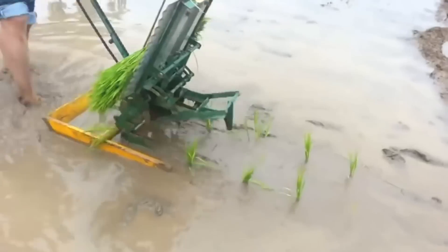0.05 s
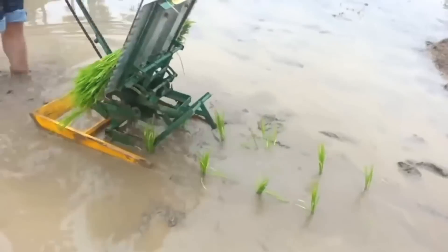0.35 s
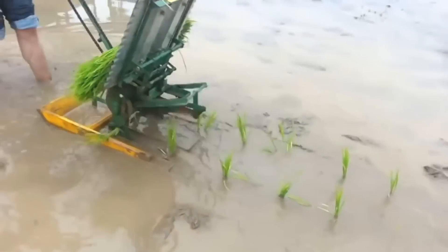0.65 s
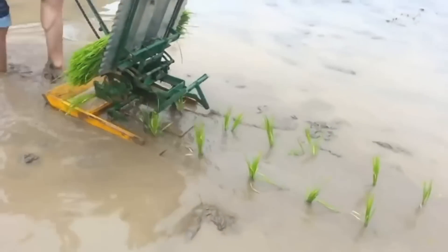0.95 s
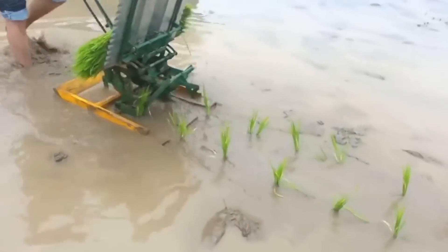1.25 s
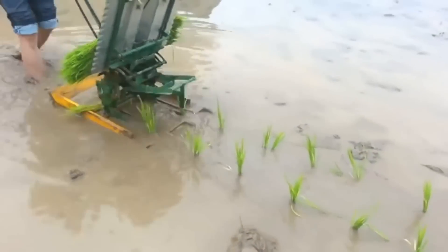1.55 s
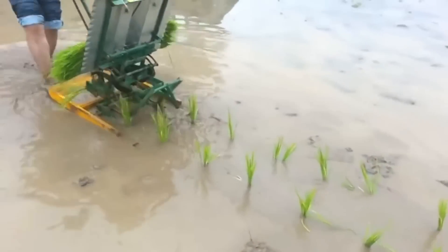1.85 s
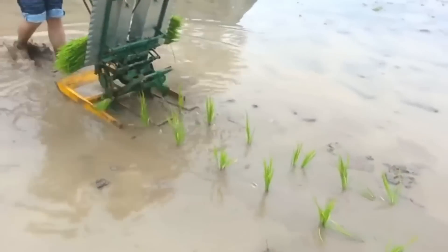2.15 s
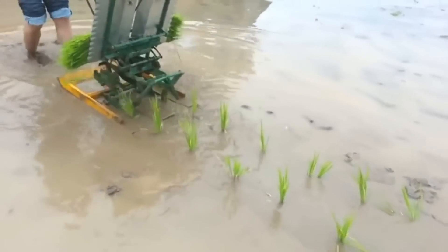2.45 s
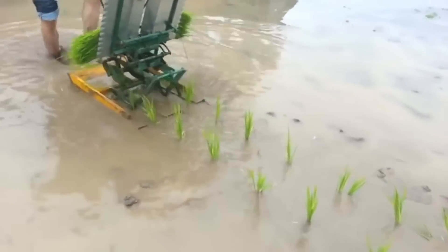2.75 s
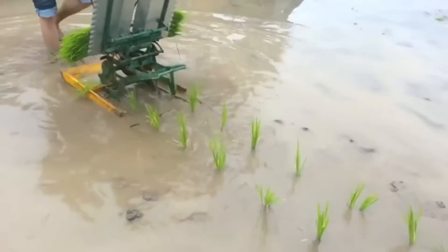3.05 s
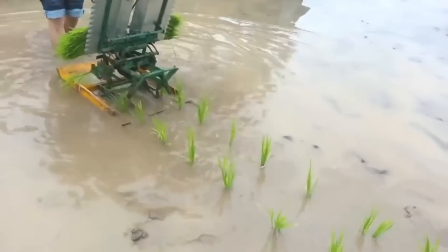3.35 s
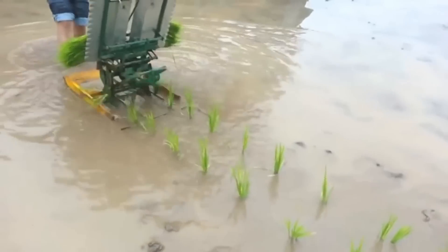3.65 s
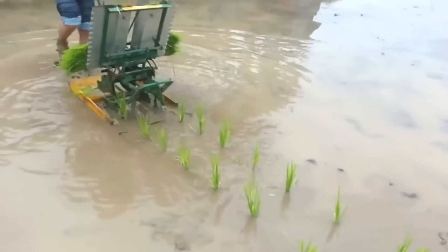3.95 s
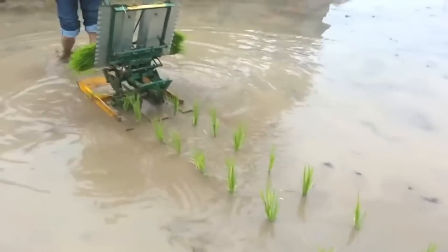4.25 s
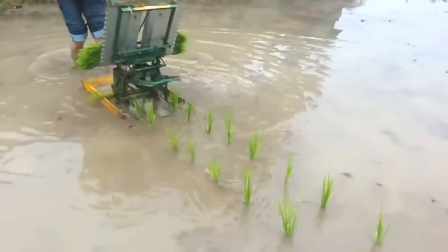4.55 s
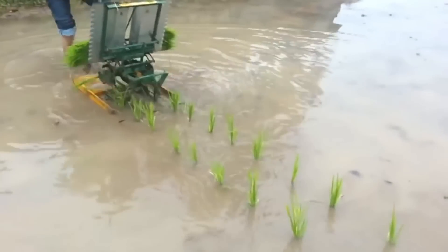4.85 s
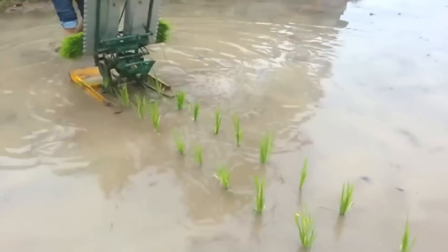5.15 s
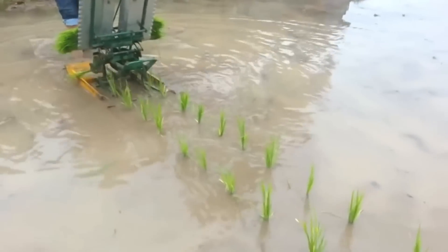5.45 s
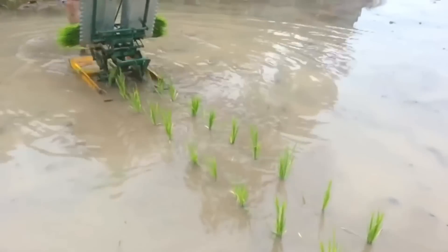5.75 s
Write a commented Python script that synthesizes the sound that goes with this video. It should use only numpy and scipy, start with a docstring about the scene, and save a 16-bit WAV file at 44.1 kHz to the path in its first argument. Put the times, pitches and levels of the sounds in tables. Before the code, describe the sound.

Close microphones in the open pick up the even metallic beat of a manual rice planter, twelve strokes in about six seconds. Slack steel parts rattle, the planting arms slam against their stop, and the mechanism ticks back, with thin pings and stray clicks between. Feet and a skid stir a continuous soft wash of shallow muddy water, which plops about halfway through and eases slightly toward the end.

```python
"""Muddy water sloshes as a hand-pulled rice transplanter works through a flooded paddy, two strokes a second.
In each stroke the slack steel linkage rattles and the planting arms slam against their stop: impacts
that excite the damped modes of steel, tray and frame. In most strokes a pawl pings, and the mechanism
ticks on its way back. Feet and skid stir up splashes and air pockets that ring as bubbles.
Heard in the open on a close pair of microphones."""
import sys
import numpy as np
from scipy import signal
from scipy.fft import rfft, irfft, next_fast_len
from scipy.io import wavfile

SR = 44100
rng = np.random.default_rng(int(sys.argv[2]) if len(sys.argv) > 2 else 0)


def pcm_store(signal):
    """Save signal as 16-bit PCM."""
    levels = np.round(np.clip(np.atleast_2d(signal), -1, 1) * 32767)
    wavfile.write(sys.argv[1], SR, levels.astype(np.int16).T)


N = 255074
CUTOFF_HZ = 14900

# Spectra of the tray, the steel and the crack of contact: (frequency [Hz], relative density [dB])
TRAY_SPECTRUM = [(120, -63), (250, -20), (420, -14), (560, -2), (760, -2), (880, -6), (1050, -4), (1400, 2),
                 (1900, 0.5), (2400, 0), (3200, -24)]
STEEL_SPECTRUM = [(1400, -41), (2200, -7), (2800, -2), (3600, 1.5), (4400, -3), (5000, -2), (5600, -14.5),
                  (7000, -33)]
CRACK_SPECTRUM = [(3500, -20), (5500, 6.5), (7500, 3), (9700, 4), (10500, 1), (12300, 0), (13200, -1.5),
                  (14600, -16)]
# The microphone pair: (frequency [Hz], coherence [0-1], phase lag of the right [rad])
MIC_PAIR = [(100, 1, -0.5), (700, 0.88, 0.3), (1610, 0.71, 0.5), (2050, 0.34, -1.53), (2660, 0.54, -3.5),
            (4000, 0.51, -2.5), (5200, 0.83, -2.5), (6540, 0.23, -2.5), (13900, 0.089, -0.5)]
# Planting strokes; levels are relative, leads precede the slam and the delay follows it:
# (slam time [s], slam level [dB], tray level [dB], thud level [dB], rattle lead [s], rattle level [dB],
#  latch lead [s], latch level [dB], rebound level [dB], return delay [s], return level [dB])
PLANTING_STROKES = [(0.195, -14, -22, -53, 0.059, -37.5, 0.023, -22, -31, 0.16, -33.5),
                    (0.7141, -12, -20.5, -42.5, 0.05, -25, 0.023, -16, -27, .127, -28),
                    (1.226, -14.5, -20, -44, 0.055, -25.5, .019, -16, -48, 0.15, -31.5),
                    (1.698, -12, -20, -44, 0.04, -30.5, 0.024, -20, -25, 0.15, -28.5),
                    (2.208, -14.5, -22.5, -48, 0.052, -21.5, 0.023, -17, -37, .150, -32.5),
                    (2.703, -15.5, -19.5, -54, 0.053, -33.5, 0.024, -20, -26, 0.13, -29),
                    (3.181, -15, -20.5, -58, 0.05, -26.5, .0225, -22, -30.5, 0.15, -33),
                    (3.6747, -16.5, -21.5, -56, .041, -41, .025, -22, -30, 0.14, -31.5),
                    (4.187, -15, -21, -51, .055, -25.5, .024, -19.5, -30.5, .152, -32),
                    (4.6994, -15.5, -24.5, -66, 0.055, -38, 0.026, -21.5, -29, .134, -36),
                    (5.182, -15, -20, -54, 0.046, -38.5, .021, -23, -30, 0.15, -34.5),
                    (5.705, -14.5, -21.5, -48.5, 0.035, -33, .0235, -22, -33, .148, -36)]


def from_db(db):
    """Decibels to amplitude ratio."""
    return 10 ** (np.asarray(db) / 20)


def unit_rms(x):
    """Normalisation to unit mean power."""
    return x / np.sqrt(np.mean(x ** 2) + 1e-20)


def at_hz(table, hz, column=1):
    """Interpolation of a table column on a log-frequency axis."""
    table = np.array(table)
    return np.interp(np.log(np.maximum(hz, 1)), np.log(table[:, 0]), table[:, column])


def add(out, start_s, sound):
    """Superposition: a sound joins the mix at a given time."""
    i = int(start_s * SR)
    out[:, i:i + sound.shape[-1]] += sound[..., :max(N - i, 0)]


def drift(rate_hz):
    """Random modulation of unit rms, interpolated between knots."""
    knots = rng.standard_normal(2000)
    return unit_rms(np.interp(np.arange(N) / SR * rate_hz, np.arange(len(knots)), knots))


def decay(t, t60):
    """Exponential damping: 60 dB in t60 seconds."""
    return from_db(-60 * t / t60)


def coloured(noises, spectrum, direct=1):
    """Partial coherence: two independent noises take on one spectrum and the pair's coherence and phase."""
    size = noises.shape[-1]
    padded = next_fast_len(size)
    hz = np.arange(padded // 2 + 1) * SR / padded
    left, independent = rfft(noises, padded)
    coherence = np.clip(direct * at_hz(MIC_PAIR, hz), 0, .99)
    lag = np.exp(-1j * at_hz(MIC_PAIR, hz, column=2))
    right = (coherence * left + np.sqrt(1 - coherence ** 2) * independent) * lag
    shaped = np.array([left, right]) * from_db(at_hz(spectrum, hz))
    return unit_rms(irfft(shaped, padded)[:, :size])


def tone(hz, cycles):
    """Phase difference: one sinusoid as it reaches the two microphones."""
    return np.sin(2 * np.pi * cycles - np.array([[0], [at_hz(MIC_PAIR, hz, column=2)]]))


def water(wash_db, bubbles_db, size_db, direct, count):
    """Incoherent summation: feet and skid stir many splashes and small bubbles into a wash."""
    # Strength of the stirring: (time [s], level [dB])
    stirring = [(0.1, -45), (0.26, -43), (0.3, -43.5), (1.74, -43), (1.85, -45.5), (3.14, -43.5),
                (3.44, -46), (4.28, -44), (4.45, -46.5), (5.32, -46), (5.45, -48), (5.78, -49.5)]
    # Spectrum of the splashes: (frequency [Hz], relative density [dB])
    splash_spectrum = [(30, -38), (90, -44), (180, -14.5), (350, -8.5), (560, -1), (1000, 0), (1600, -3.5),
                       (2400, -3), (3800, -5.5), (4800, -11), (6000, -20), (8000, -22.5), (12000, -24),
                       (15000, -31)]
    stir_db = np.interp(np.arange(N) / SR, *np.transpose(stirring))
    stir_db += wake(lift_db=1.5, delay_s=0.12, width_s=0.063)
    splashes = rng.standard_normal((2, N)) * from_db(1.23 * drift(250) + 0.6 * drift(40))
    fizz = np.zeros((2, N))
    for when, pitch, size, side in rng.random((count, 4)):
        level_db = size_db * min(-np.log(1 - size), 2.5)
        pan_db = (side - .5) * np.array([[5], [-5]])
        gain = from_db(level_db + pan_db) * np.sqrt(2 ** pitch)
        add(fizz, when * N / SR, gain * bubble(520 * 8 ** pitch, cycles=57, glide=0.056))
    wash = coloured(sloshing(splashes, patchy_db=2.0, rate_hz=22, bands=9), splash_spectrum, direct)
    return from_db(stir_db) * (from_db(wash_db) * wash + from_db(bubbles_db) * unit_rms(fizz))


def sloshing(splashes, patchy_db, rate_hz, bands):
    """Independent band modulation: splashes of different sizes come and go."""
    size = next_fast_len(N)
    spectrum, hz = rfft(splashes, size), np.arange(size // 2 + 1) * SR / size
    centres_hz = np.geomspace(400, 6000, bands)
    out = np.zeros((2, N))
    for weights in np.eye(bands):
        band = irfft(spectrum * np.interp(hz, centres_hz, weights), size)[:, :N]
        out += band * from_db(patchy_db * drift(rate_hz))
    return out


def bubble(hz, cycles, glide):
    """Bubble resonance: an air pocket pulsates, rising in pitch as it nears the surface."""
    t60 = cycles / hz
    t = np.arange(int(t60 * SR)) / SR
    return tone(hz, hz * t * (1 + glide * t / t60)) * decay(t, t60) * (1 - np.exp(-t * hz / 2))


def strokes(rattle_gap_s, bounce_s, bounce_loss_db, rebound_s):
    """Backlash: slack rattles, the latch trips, the arms slam and hop, the linkage falls back and ticks."""
    out = np.zeros((2, N))
    for (slam_s, slam_db, tray_db, thud_db, rattle_lead, rattle_db,
         latch_lead, latch_db, rebound_db, return_delay, return_db) in PLANTING_STROKES:
        for k in range(3):
            rattle = knock(rattle_db, tray_db=-4.0, steel_db=-0.5, crack_db=-9.5, t60=0.13)
            lead = rattle_lead - k * rattle_gap_s
            if lead > latch_lead + rattle_gap_s / 2:  # only until the latch trips
                add(out, slam_s - lead, rattle)
        latch = knock(latch_db, tray_db=-2.5, steel_db=1.5, crack_db=-9.5, t60=0.095)
        add(out, slam_s - latch_lead, latch)
        add(out, slam_s, slam(slam_db, tray_db, thud_db))
        add(out, slam_s + bounce_s * rng.uniform(.7, 1.3),
            knock(slam_db - bounce_loss_db, tray_db=-8.5, steel_db=3.5, crack_db=-11, t60=0.041))
        add(out, slam_s + rebound_s * rng.uniform(.9, 1.1),
            knock(rebound_db, tray_db=-5, steel_db=2.0, crack_db=-12.5, t60=0.078))
        add(out, slam_s + return_delay, return_tick(steel_db=return_db - 2.5, crack_db=return_db - 15))
    return out


def impact(spectrum, rise_s, hold_s, t60, tail_db, tail_t60, uneven_db):
    """Impulse response: crowded modes of uneven strength fall fast, then linger in a slower tail."""
    t = np.arange(SR // 3) / SR
    white = rfft(rng.standard_normal((2, len(t))))
    strengths = np.repeat(rng.standard_normal(len(t) // 40), 40)[:white.shape[1]]  # 120 Hz bands
    modes = coloured(irfft(white * from_db(uneven_db * strengths), len(t)), spectrum)
    early = decay(np.maximum(t - hold_s, 0), t60)
    tail = from_db(tail_db) * decay(t, tail_t60)
    envelope = (1 - np.exp(-t / rise_s)) * np.hypot(early, tail)
    return unit_rms(modes * envelope) * np.sqrt(np.mean(envelope ** 2))


def knock(db, tray_db, steel_db, crack_db, t60):
    """Clearance impact: play in a joint closes, steel clinks and the tray answers, with crack and jolt."""
    steel = impact(STEEL_SPECTRUM, 0.0012, 0.0061, t60=t60, tail_db=-10.5, tail_t60=.2, uneven_db=6)
    tray = impact(TRAY_SPECTRUM, 0.0026, 0.0032, t60=0.12, tail_db=-13, tail_t60=0.26, uneven_db=2.5)
    crack = impact(CRACK_SPECTRUM, 0.00067, 0.0054, t60=0.12, tail_db=-7, tail_t60=0.19, uneven_db=3)
    out = from_db(steel_db) * steel + from_db(tray_db) * tray + from_db(crack_db) * crack
    add(out, 0, from_db(tray_db - 46.5) * thud(top_hz=248, t60=0.078, incoherent=0.93))
    return from_db(db) * out


def thud(top_hz, t60, incoherent):
    """Structure-borne sound: a dull, low-passed jolt through the skid."""
    t = np.arange(SR // 8) / SR
    push = rng.standard_normal((3, len(t))) * decay(t, t60)
    lowpass = signal.butter(2, top_hz, fs=SR, output="sos")
    return unit_rms(signal.sosfilt(lowpass, push[0] + incoherent * push[1:]))


def frame(contacts, vary_db):
    """Forced resonance: tray and frame ring on, each contact driving their modes in different shares."""
    # Modes of tray and frame: (frequency [Hz], bandwidth [Hz], mean gain [dB])
    frame_modes = [(551, 21, 2), (713, 50, -4.5), (786, 43, 1.5), (1017, 50.5, 9), (1116, 37, 3.5),
                   (1640, 80, -2), (1830, 30, 2), (2136, 36, -1.5), (2540, 49, -2), (3750, 45, -7)]
    out = contacts.copy()
    for hz, width_hz, gain_db in frame_modes:
        radius = np.exp(-np.pi * width_hz / SR)
        poles = [1, -2 * radius * np.cos(2 * np.pi * hz / SR), radius ** 2]
        scale = (1 - radius ** 2) / 2  # unit gain at resonance
        drive = contacts * from_db(gain_db + vary_db * drift(15))
        out += signal.lfilter([scale, 0, -scale], poles, drive + 1e-18)
    return out


def pawl(t60, split, partner_db):
    """Beating: a small steel tongue rings briefly on two close modes."""
    # Pings of the pawl: (time [s], level [dB], frequency [Hz])
    pings = [(.144, -21, 4750), (0.173, -14, 4350), (.692, -14, 4600), (1.179, -15, 4660),
             (1.191, -7.5, 4640), (2.682, -14.5, 4230), (3.159, -19, 4220), (3.649, -24, 3800),
             (4.165, -24, 4120), (4.673, -19, 4350)]
    out, t = np.zeros((2, N)), np.arange(SR // 8) / SR
    envelope = decay(t, t60) * (1 - np.exp(-t / 0.00061))
    for start_s, db, hz in pings:
        partner = from_db(partner_db) * tone(hz, hz * (1 - split) * t + rng.random())
        add(out, start_s, from_db(db) * (tone(hz, hz * t) + partner) * envelope)
    return out


def slam(db, tray_db, thud_db):
    """Broadband excitation: the arms hit their stop with a crack, clanging steel and tray, and a thud."""
    tray = impact(TRAY_SPECTRUM, 0.0018, 0.0063, t60=0.098, tail_db=-7, tail_t60=0.41, uneven_db=2.5)
    steel = impact(STEEL_SPECTRUM, 0.00042, 0.0059, t60=0.12, tail_db=-8.5, tail_t60=0.31, uneven_db=3)
    crack = impact(CRACK_SPECTRUM, .00047, .0045, t60=.054, tail_db=-10.5, tail_t60=.24, uneven_db=3.5)
    out = from_db(tray_db + 0.04) * tray + from_db(db - 2.0) * steel + from_db(db - 4.5) * crack
    add(out, 0, from_db(thud_db - 2) * thud(top_hz=220, t60=0.03, incoherent=1.0))
    return out


def wake(lift_db, delay_s, width_s):
    """Amplitude modulation, in dB: the water swells as it swirls back after each stroke."""
    t = np.arange(N) / SR
    return lift_db * sum(np.exp(-((t - row[0] - delay_s) / width_s) ** 2) for row in PLANTING_STROKES)


def return_tick(steel_db, crack_db):
    """Light impact: steel touches steel and excites only high modes."""
    clink = impact(STEEL_SPECTRUM, .001, .006, t60=.09, tail_db=-14, tail_t60=.15, uneven_db=3)
    snap = impact(CRACK_SPECTRUM, .001, .004, t60=.08, tail_db=-14, tail_t60=.15, uneven_db=3)
    return from_db(steel_db) * clink + from_db(crack_db) * snap


def loose_parts(faint_db, spread_db, low_hz, high_hz, count):
    """Intermittent contact: loose parts tick as the machine is dragged along."""
    # The clearest stray ticks: (time [s], relative level [dB], ring frequency [Hz])
    clear_ticks = [(0.432, -37, 2400), (.482, -42, 5800), (1.582, -37, 4570), (1.62, -34, 3800),
                   (1.643, -34, 4300), (2.558, -40, 5400), (3.089, -34.5, 4900), (3.278, -32.5, 2320),
                   (3.528, -37.5, 3730), (3.904, -37, 3560), (4.096, -35, 4800)]
    out = np.zeros((2, N))
    for start_s, db, hz in clear_ticks:
        add(out, start_s, from_db(db + 1.0) * small_part(hz, width=0.31, t60=0.074))
    for k, (when, size, pitch) in enumerate(rng.random((count, 3))):
        part = small_part(low_hz * (high_hz / low_hz) ** pitch, width=0.26, t60=0.063)
        add(out, (k + when) / count * N / SR, from_db(faint_db + spread_db * size) * part)
    return out


def small_part(hz, width, t60):
    """Free vibration: a small loose part rings for a moment in a narrow band."""
    spectrum = [(hz / (1 + width) ** 2, -24), (hz, 0), (hz * (1 + width), -16), (CUTOFF_HZ, -34)]
    return impact(spectrum, 0.00072, 0.0025, t60=t60, tail_db=-16, tail_t60=.12, uneven_db=3)


def plops():
    """Cavity resonance: mud lets go with a short smack and a ringing air pocket."""
    # Plops of mud and water: (time [s], relative level [dB], starting frequency [Hz])
    air_pockets = [(2.051, -32.5, 1290), (2.891, -31.5, 607), (2.892, -30.5, 1550), (2.972, -29.5, 608),
                   (2.989, -29.5, 687), (2.990, -29, 1140), (3.143, -24, 608), (3.163, -17.5, 706),
                   (3.528, -31, 1130)]
    out = np.zeros((2, N))
    for start_s, db, hz in air_pockets:
        smack = impact(TRAY_SPECTRUM, .001, .004, t60=.04, tail_db=-20, tail_t60=.1, uneven_db=4)
        add(out, start_s, from_db(db + 6.5) * bubble(hz, cycles=20, glide=0.039))
        add(out, start_s, from_db(db - 12.0) * smack)
    return out


def scene():
    """Superposition of machine, mud and water."""
    contacts = strokes(rattle_gap_s=.013, bounce_s=.025, bounce_loss_db=10.5, rebound_s=.056)
    contacts += loose_parts(faint_db=-46, spread_db=6, low_hz=1500, high_hz=4800, count=36)
    machine = frame(contacts, vary_db=1.5) * from_db(-2.0) + pawl(t60=0.08, split=0.057, partner_db=-4)
    return machine + plops() + water(wash_db=1.77, bubbles_db=-6, size_db=3.5, direct=0.54, count=1100)


def record(dry):
    """Frequency response: the two microphones differ in colour; the sound fades in and the top is cut."""
    # The left microphone over the right: (frequency [Hz], level difference [dB])
    imbalance = [(60, 0.0), (99, 0), (160, 0.0), (270, 0), (450, 0), (740, 0.5), (1220, -0.5), (2010, 5.5),
                 (3330, -1.0), (5500, -0.5), (9080, 1.0), (15000, 1.5)]
    size = next_fast_len(N)
    tilt_db = at_hz(imbalance, np.arange(size // 2 + 1) * SR / size)
    heard = irfft(rfft(dry, size) * from_db(tilt_db * np.array([[.5], [-.5]])), size)[:, :N]
    fade_in = np.clip(np.arange(N) / SR / 0.062, 0, 1) ** 3
    lowpass = signal.ellip(10, .2, 80, CUTOFF_HZ, fs=SR, output="sos")
    return signal.sosfilt(lowpass, heard * fade_in)


dry = scene()
out = record(dry)
pcm_store(out)
```